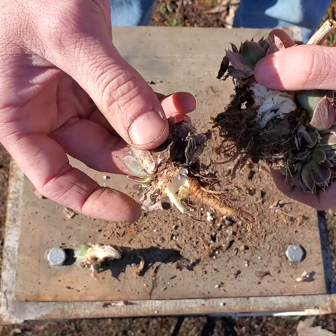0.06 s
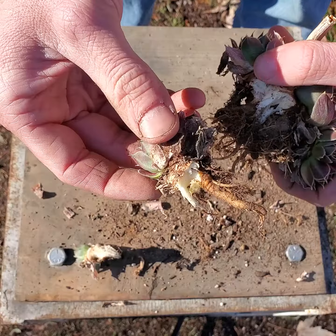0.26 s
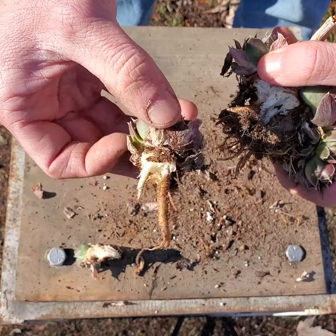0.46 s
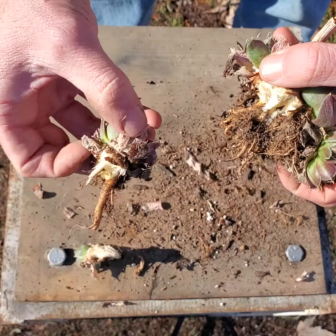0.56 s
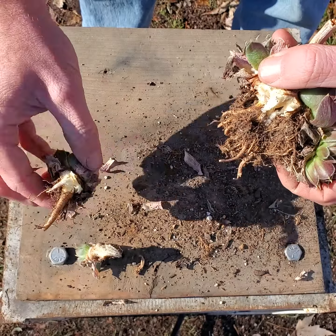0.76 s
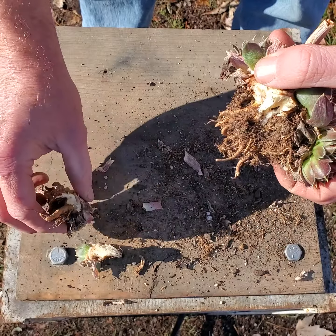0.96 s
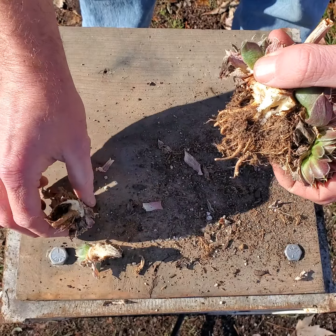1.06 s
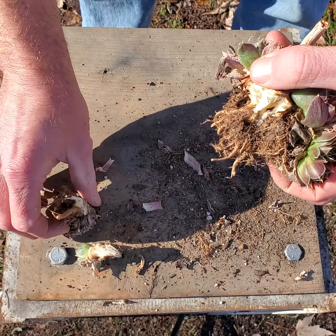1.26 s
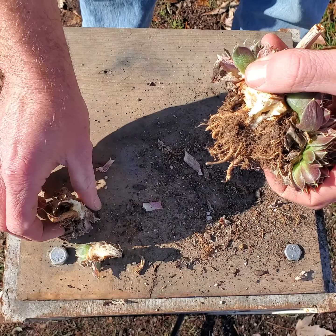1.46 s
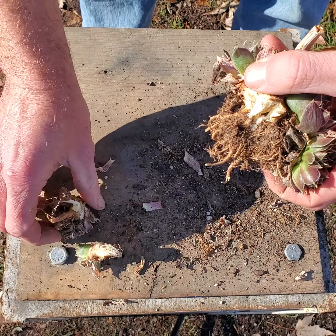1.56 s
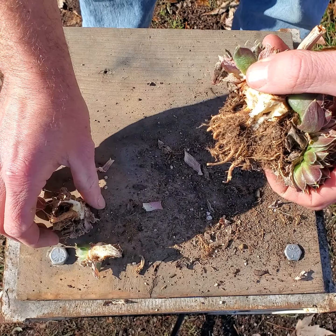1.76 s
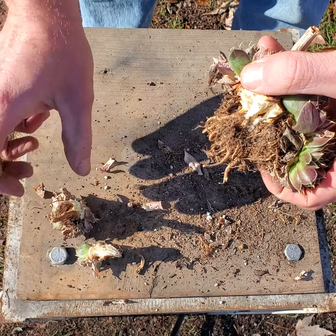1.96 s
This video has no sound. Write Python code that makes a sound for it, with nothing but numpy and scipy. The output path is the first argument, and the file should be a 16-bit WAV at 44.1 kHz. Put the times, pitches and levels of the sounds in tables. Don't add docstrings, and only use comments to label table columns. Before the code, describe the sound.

Dry, bright root snaps and crackle as hands tear a fleshy plant clump apart, densest around half a second, then thinning to scattered ticks; quiet outdoor rumble beneath, close phone microphone, crackle strongly on the left.

```python
import sys
import numpy as np
from scipy import signal
from scipy.fft import rfft, irfft
from scipy.io import wavfile
from scipy.ndimage import uniform_filter1d

SR = 44100
rng = np.random.default_rng(int(sys.argv[2]) if len(sys.argv) > 2 else 0)


def invert_db(level):
    return 10 ** (np.asarray(level, dtype=float) / 20)


def unload_wav(signal):
    wavfile.write(
        sys.argv[1],
        SR,
        np.round(np.clip(np.atleast_2d(signal).T, -1, 1) * 32767).astype(np.int16),
    )


N = 88200
T = np.arange(N) / SR
SIZE = 2 ** 17
HZ = np.maximum(np.arange(SIZE // 2 + 1) * SR / SIZE, 1)

# (frequency [Hz], level [dB])
RUMBLE_SPECTRUM = [(20, -22.5), (40, -4.5), (75, -3), (115, -6), (170, -14), (300, -20), (420, -30),
                   (1000, -63.5)]
# (frequency [Hz], level [dB])
HISS_SPECTRUM = [(200, -37), (700, -33), (1400, -36), (3000, -45.5), (4500, -51.5), (7800, -64.5),
                 (10000, -58.5), (14000, -53.5)]
# (frequency [Hz], share [0-1])
PORT_LIKENESS = [(30, 0.83), (130, 0.86), (290, 0.55), (640, 0.16), (1400, 0.02)]
# (frequency [Hz], left minus right [dB])
AIR_BALANCE = [(380, -1), (700, 2.5), (1300, 5), (2400, 5), (5500, 4), (8000, 1)]
# (time [s], level [dB])
TRAFFIC_SWELL = [(0, 0), (.4, -0.5), (.5, 2.5), (.66, 3.5), (.76, -1), (1.25, -0.5), (1.4, 1.5), (1.62, -2),
                 (1.72, -4), (2.0, -1.5)]
# (start [s], end [s])
HISS_DIPS = [(.17, .27), (.76, 1.1), (1.19, 1.31)]
# (time [s], level [dB])
DRONE_LEVEL = [(0.0, -67), (0.06, -64), (0.09, -72.5), (0.431, -60.5), (0.44, -53), (0.66, -51),
               (0.75, -78), (0.78, -54), (0.98, -62), (1.07, -48), (1.14, -65.5), (1.54, -55.5),
               (1.97, -63), (2.0, -52.5)]
# (frequency [Hz], level [dB])
THUMP_SPECTRUM = [(150, -20), (280, 10), (550, -4), (930, 9), (1400, -3), (2000, -25)]
# (time [s], length [s], pitch [Hz], level [dB])
STEM_CREAKS = [
    (.24, .022, 1340, -74),
    (.44, 0.0081, 1800, -60.5),
    (.458, 0.0057, 1700, -67),
    (0.5045, 0.04, 2160, -65.5),
    (.5, 0.027, 1330, -75.5),
    (0.628, 0.017, 1960, -73.5),
    (.615, 0.023, 2430, -74),
    (.612, .014, 4030, -61.5),
    (.61, 0.0072, 9240, -48.5),
    (1.114, 0.0052, 2740, -63),
]
# (start [s], strongest [s], end [s], level [dB], low crunch re level [dB])
HAND_PULLS = [(-.03, 0.0026, 0.28, -72, -22), (0.15, 0.17, 0.18, -62, -32), (0.198, .24, 0.27, -52.5, -23),
              (0.273, 0.33, 0.4, -88, -3), (0.399, 0.44, .49, -44.5, -13.5),
              (0.449, 0.5, 0.55, -43.5, -10.5), (0.566, 0.61, 0.64, -44.5, -14.5),
              (0.657, 0.67, 0.69, -55, -14.5), (0.694, 0.743, 0.74, -78, 3.5),
              (0.751, 0.78, 0.81, -56.5, -25), (0.767, 0.88, 0.94, -53.5, -26.5),
              (0.9, 0.95, 1.566, -68.5, -21), (1.109, 1.107, 1.158, -58, -10),
              (1.229, 1.239, 1.334, -61.5, -10.5), (1.311, 1.4, 1.415, -61.5, -4),
              (1.376, 1.48, 1.477, -65.5, -8.5), (1.477, 1.49, 1.581, -62.5, -12),
              (1.6, 1.62, 1.64, -76.5, -3.5), (1.955, 1.967, 2.03, -66, -15.5)]
# (time [s], peak [dB], low ring re peak [dB], low ring pitch [Hz])
ROOT_SNAPS = [(0.0284, -33.5, -33, 5400), (0.1381, -50.5, -4, 6600), (0.1397, -53, 2, 6700),
              (0.1677, -24.5, -24.5, 7200), (0.1914, -37, -22, 6800.0), (0.1978, -37, -17, 6500),
              (0.2367, -32, -22, 5670), (0.2466, -27.5, -18, 6960), (0.3132, -51.5, -10, 6940),
              (0.3957, -33, -11, 6230), (0.419, -34, -24, 5800), (0.4356, -21, -15, 6860),
              (0.4373, -28, -5, 5700), (0.4606, -12, -22, 3160), (0.4736, -32, -14, 6800),
              (0.5363, -28, -23, 4390.0), (0.574, -32, -9, 3620.0), (0.579, -24, -7, 6890.0),
              (0.5976, -24, -17, 6100), (0.6132, -18, -33, 6650), (0.6351, -33, -27, 1640.0),
              (0.658, -30.5, -6, 6700), (0.6617, -35, -6, 6500), (0.7083, -42.5, -4, 6000),
              (0.7379, -54, 8, 4240), (0.7561, -34, -8, 6770), (0.7577, -41, -6, 7140),
              (0.7686, -35, -4, 6620), (0.8903, -45, -16, 7100), (0.9079, -37.5, -1.5, 7000),
              (0.9499, -34.5, -8, 4780), (0.9554, -34.5, -11, 7000), (1.0478, -48, -16, 7020.0),
              (1.071, -43, -10, 6070.0), (1.1143, -34.5, -8.5, 2670.0), (1.1324, -56, -12, 6590.0),
              (1.187, -30, -19, 6800), (1.1903, -44, -16, 1460.0), (1.2163, -45, -6, 6600),
              (1.3028, -31, -25, 5600), (1.3369, -45.5, 12.5, 5330), (1.3554, -40.5, -15, 3960),
              (1.3703, -32.5, 2.5, 6500.0), (1.3761, -41, 2, 4160), (1.3859, -34, -20, 2280.0),
              (1.4118, -40, -15, 4220.0), (1.4855, -34, -14, 6800), (1.5008, -33, -27, 6260),
              (1.5034, -34.5, -26.5, 6600), (1.9697, -42, -11, 6850.0)]
# (time [s], peak [dB], low ring re peak [dB])
MORE_SNAPS = [(0.0477, -51, -22), (0.0592, -50, -18), (0.0791, -50.5, -6), (0.0895, -49.5, -28),
              (0.123, -51, -6), (0.1547, -52, -11), (0.209, -40.5, -17), (0.2184, -31.5, -16),
              (0.26, -38.5, -10), (0.3531, -54.5, -1), (0.4172, -35, -17), (0.425, -35, -10),
              (0.4405, -28, -15), (0.4489, -24, -6), (0.4534, -34, -19), (0.4965, -28, -19),
              (0.498, -21.5, -19), (0.5003, -22, -25), (0.5017, -25, -21), (0.5181, -31, -4),
              (0.521, -37, -24), (0.5316, -32, -17), (0.6076, -32, -12), (0.6103, -26.5, -14),
              (0.6641, -40, -11), (0.7875, -44, -21), (0.7986, -43, -15), (0.8048, -46, -5),
              (0.8248, -40.5, -12), (0.8338, -41, -11), (0.863, -38, -11.5), (0.871, -35, -23),
              (0.877, -44, -9), (0.8807, -40, -11), (0.8829, -41, -18), (0.901, -40, -15),
              (0.9427, -45, -8), (0.9772, -50, -14), (0.9878, -48, -10), (1.0332, -50, -9),
              (1.097, -54, -14), (1.1447, -48, -11), (1.154, -52, -5), (1.1607, -53, -12),
              (1.1689, -49, -7), (1.2364, -50, -3), (1.3053, -42, -21), (1.3283, -40, -3),
              (1.4235, -39, -1), (1.4678, -54, -18), (1.511, -37.5, -23), (1.5714, -51, -22),
              (1.6176, -52.5, -12), (1.964, -56, -10), (1.983, -46.5, -19)]
# (lowest [Hz], highest [Hz])
MORE_SNAP_RING_HZ = [4200, 7000]
FRAGMENT_HZ = [2000, 2800, 3860, 6500, 10100, 10870, 13300]
# (frequency [Hz], level [dB])
CRACK_SPECTRUM = [(2500, -55.5), (4500, -24.5), (6700, -13.5), (8000, -18), (9300, -12.5), (11000, -11.5),
                  (13300, -3.5), (14500, -7)]
# (frequency [Hz], level [dB])
CRUNCH_SPECTRUM = [(1100, -37), (1500, -6.5), (2000, -6), (3000, -1), (4200, 3.5), (5200, -10.5),
                   (6500, -4.5), (9000, -25.5)]
# (frequency [Hz], gain [dB])
TOP_ROLL_OFF = [(14400, 0), (14800, -26), (15700, -45), (16200, -70)]
# (frequency [Hz], gain [dB])
SNAP_ROLL_OFF = [(14300, 0), (16000, -30)]
# (frequency [Hz], gain [dB])
BODY_SHADE = [(700, -6), (1300, -15), (2400, -22), (4400, -38), (7500, -50), (10000, -40), (12500, -31),
              (15000, -42)]


def read(table):
    hz, value = np.transpose(table)
    return np.interp(np.log(HZ), np.log(hz), value)


def colour(x, db):
    cepstrum = irfft(db * np.log(10) / 20)
    cepstrum[1:SIZE // 2] *= 2
    cepstrum[SIZE // 2 + 1:] = 0
    return irfft(rfft(x, SIZE) * np.exp(rfft(cepstrum)))[:N]


def unit(db):
    return db - 10 * np.log10(np.mean(invert_db(db) ** 2))


def walk(rate_hz):
    hold = int(SR / rate_hz)
    steps = np.repeat(rng.standard_normal(N // hold + 1), hold)
    level = uniform_filter1d(steps, hold)[:N]
    return level / level.std()


def fade(t, t60_s):
    return (t >= 0) * np.exp(-np.log(1000) * np.maximum(t, 0) / t60_s)


def bump(centre_s, length_s):
    return np.exp(-((T - centre_s) / length_s) ** 2)


def uniform_rms(x):
    return x / np.sqrt(uniform_filter1d(x ** 2, size=1500))


def outdoors():
    level_db, dip_db = -58.5, -6
    like = read(PORT_LIKENESS)
    spectrum = (invert_db(read(RUMBLE_SPECTRUM)) + invert_db(read(HISS_SPECTRUM))) * invert_db(read(TOP_ROLL_OFF))
    mid = rfft(rng.standard_normal(SIZE)) * spectrum
    side = rfft(rng.standard_normal(SIZE)) * spectrum
    pair = mid * np.sqrt(1 + like) + side * np.sqrt(1 - like) * np.array([[1], [-1]])
    pair = pair * invert_db(read(AIR_BALANCE) * np.array([[0.5], [-0.5]]))
    swell = np.interp(T, *np.transpose(TRAFFIC_SWELL))
    dipped = sum((T > start) * (T < end) * 1.0 for start, end in HISS_DIPS)
    dip = uniform_filter1d(dip_db * dipped, size=600)
    octave = np.clip(np.log2(HZ / 30), 0, 9)
    out = 0
    for k in range(10):
        share = np.clip(1 - np.abs(octave - k), 0, 1)
        drift = 1.2 * walk(3.0) + 1.2 * walk(12.0)
        drift = drift + (k < 5) * swell + (k in (6, 7)) * dip
        out = out + irfft(pair * share)[:, :N] * invert_db(drift)
    return out * invert_db(level_db) / out.std()


def drone():
    pitch_hz, wander_hz, throb_db = 78, 4, 2.2
    phase = 2 * np.pi * np.cumsum(pitch_hz + wander_hz * walk(14.0)) / SR
    level_db = np.interp(T, *np.transpose(DRONE_LEVEL)) + throb_db * walk(30.02)
    return np.sqrt(2) * invert_db(level_db) * np.sin(phase)


def insect():
    start_s, length_s, pitch_hz, level_db = 1.89, 0.045, 6330, -90
    return invert_db(level_db + 2 * walk(60.0)) * bump(start_s, length_s) * np.sin(2 * np.pi * pitch_hz * T)


def set_down():
    thump_s, thump_db, thump_t60_s = 1.322, -63, 0.04
    rub_s, rub_length_s, rub_db = 1.33, 0.2, -79
    thump = invert_db(thump_db) * fade(T - thump_s, thump_t60_s)
    rub = invert_db(rub_db + 4.8 * walk(24.52)) * bump(rub_s, rub_length_s)
    return colour((thump + rub) * rng.standard_normal(N), unit(read(THUMP_SPECTRUM)))


def creaks():
    width = 0.12
    out = 0
    for s, length_s, hz, db in STEM_CREAKS:
        band = np.exp(-((HZ / hz - 1) / width) ** 2)
        tone = irfft(rfft(rng.standard_normal(N), SIZE) * band)[:N]
        out = out + invert_db(db) * bump(s, length_s) * uniform_rms(tone)
    return out


def grains():
    grains_per_s, spread_db, cap_db = 1500, 2, 7
    bunch_db, bunch_per_s, fizz_db = 4.5, 330, -11
    hit = rng.random(N) < grains_per_s / SR
    size_db = np.minimum(spread_db * rng.exponential(size=N), cap_db)
    g = hit * rng.uniform(-0.88, 1, N) * invert_db(size_db)
    g = g / g.std() + invert_db(fizz_db) * rng.standard_normal(N)
    return uniform_rms(g * invert_db(bunch_db * walk(bunch_per_s)))


def patchy(env, db):
    own_share = 0.65
    common, out = grains(), 0
    for k in range(len(FRAGMENT_HZ)):
        g = np.sqrt(1 - own_share) * common + np.sqrt(own_share) * grains()
        band = np.interp(HZ, FRAGMENT_HZ, np.arange(len(FRAGMENT_HZ)) == k)
        out = out + rfft(env * g, SIZE) * np.sqrt(band)
    return colour(irfft(out)[:N], db)


def crackle():
    edge_db, silent_db = -18.5, -90
    high, low = np.zeros(N), np.zeros(N)
    for start, peak, end, db, low_db in HAND_PULLS:
        times = [start - 0.06, start, peak, end, end + 0.19]
        env = invert_db(db + np.interp(T, times, [silent_db, edge_db, 0, edge_db, silent_db]))
        high = high + env
        low = low + env * invert_db(low_db)
    bright = unit(read(CRACK_SPECTRUM) + read(TOP_ROLL_OFF))
    return patchy(high, bright) + patchy(low, unit(read(CRUNCH_SPECTRUM)))


def snaps():
    length = 900
    rise_s, burst_t60_s, burst_db = 0.0004, 0.0034, -2
    port_hz, port_db = 13300, -2
    ring_t60_s, ring_tone, ring_noise = 0.0045, 0.35, 2.4
    u = T[:length]
    rise = 1 - np.exp(-(u / rise_s) ** 2)
    burst_env, ring_env = rise * fade(u, burst_t60_s), rise * fade(u, ring_t60_s)
    high, ring = np.zeros(N + length), np.zeros(N + length)
    rows = list(ROOT_SNAPS) + [(*tick, rng.uniform(*MORE_SNAP_RING_HZ)) for tick in MORE_SNAPS]
    for s, db, low_db, hz in rows:
        i = int(s * SR)
        b = rng.uniform(-1, 1, length)
        b = np.sign(b) * np.sqrt(np.abs(b))
        detune = 1 + 0.067 * b[0]
        port = invert_db(port_db) * np.sin(2 * np.pi * port_hz * detune * u)
        high[i:i + length] += invert_db(db + burst_db) * (b + port) * burst_env
        rough = ring_tone + ring_noise * uniform_filter1d(b[::-1], size=6)
        ring[i:i + length] += invert_db(db + low_db) * ring_env * np.sin(2 * np.pi * hz * u) * rough
    sharp = unit(read(CRACK_SPECTRUM) + read(SNAP_ROLL_OFF))
    stem = np.minimum(read(CRUNCH_SPECTRUM) + 8, 0)
    return colour(high[:N], sharp) + colour(ring[:N], stem)


def scene():
    floor = outdoors() + drone()
    near = insect() + 2 * (set_down() + creaks() + crackle() + snaps())
    return np.array([near, colour(near, read(BODY_SHADE))]) + floor


def low_pass(x):
    return signal.sosfilt(signal.butter(12, 15780, fs=SR, output="sos"), x)


def record(dry):
    return low_pass(dry)


dry = scene()
out = record(dry)
unload_wav(out)
```